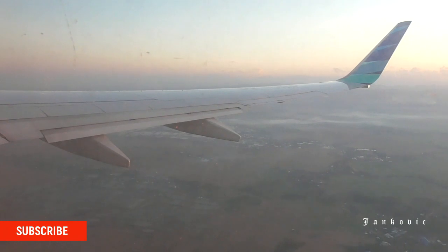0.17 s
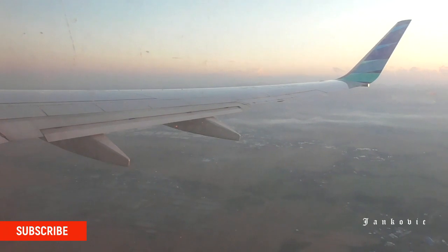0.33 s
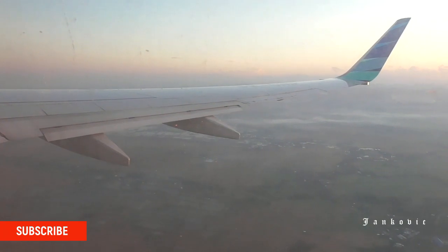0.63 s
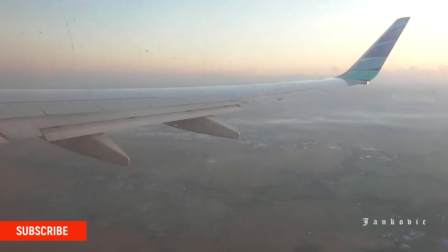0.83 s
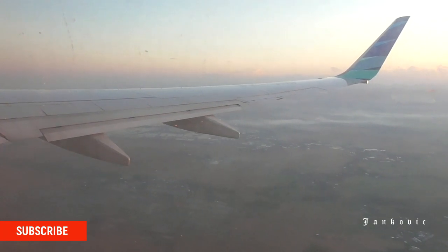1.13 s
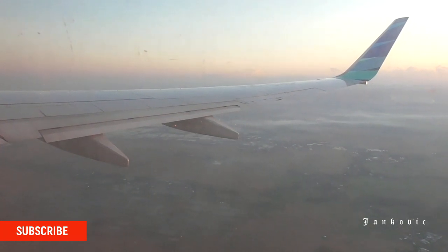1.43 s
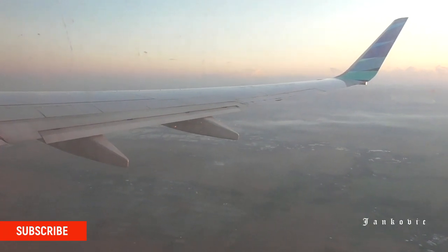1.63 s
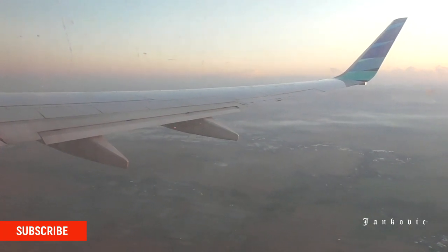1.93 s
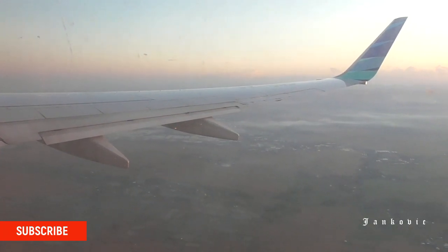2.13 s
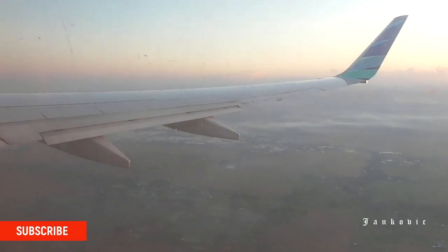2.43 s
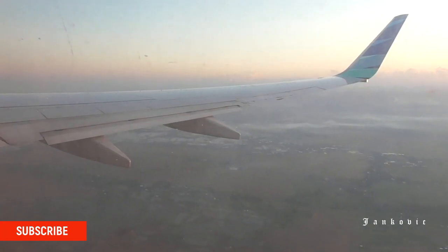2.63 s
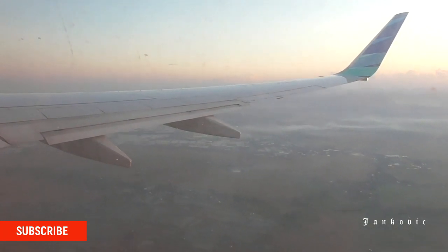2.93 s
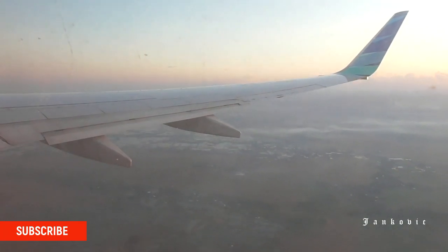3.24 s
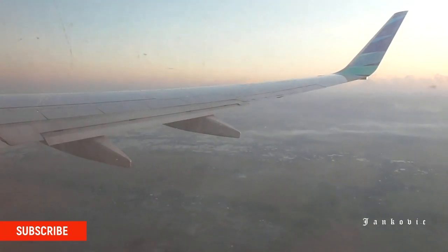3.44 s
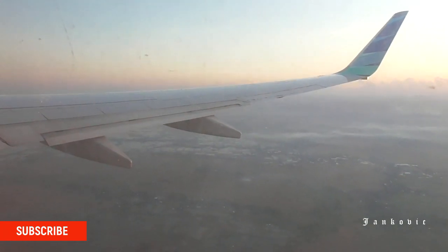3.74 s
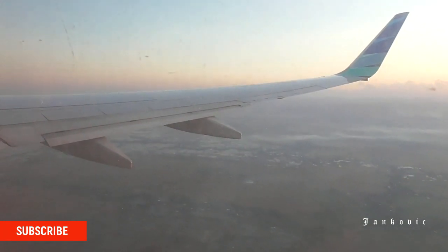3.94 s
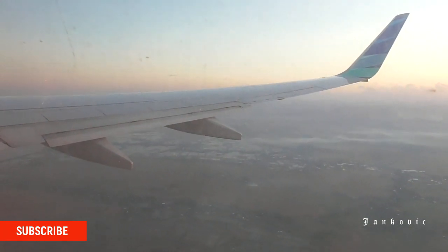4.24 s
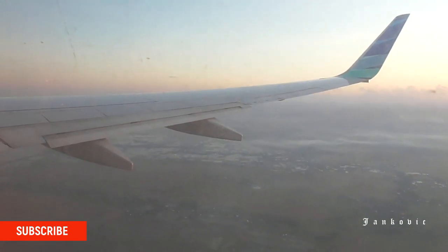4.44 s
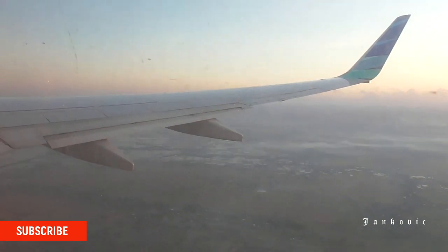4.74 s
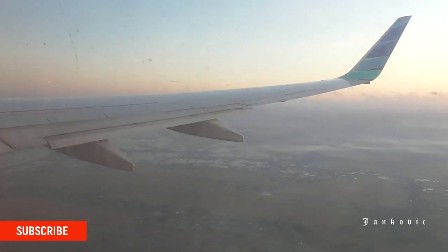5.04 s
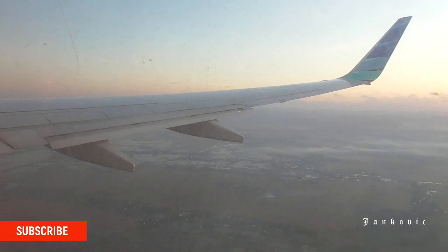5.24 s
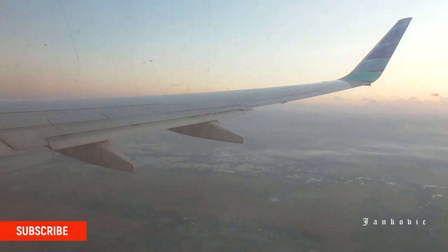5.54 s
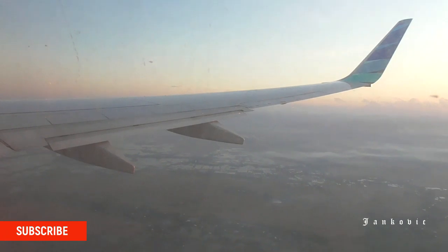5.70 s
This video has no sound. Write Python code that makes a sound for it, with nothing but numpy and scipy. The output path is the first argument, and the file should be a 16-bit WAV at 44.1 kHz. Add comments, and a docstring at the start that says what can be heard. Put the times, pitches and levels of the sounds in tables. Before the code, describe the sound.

A window seat inside a jet airliner in flight, about 5.9 seconds, starting almost instantly at full loudness and ending without a fade. A deep, dense engine roar dominates, heavy in the bass and low mids, fluttering randomly like wind-blown rumble but steady overall. A blurred low hum is buried in it, not a clear tone. Far beneath, muffled air rushes along the wall and window, with a very faint, wider vent hiss above. The air swells gently near 0.4 s, is weakest near 2.9 s, and recovers by 3.5 s. Very short low bumps of only a few milliseconds surface near 0.9, 1.4, 2.0, 2.3, 3.6, 4.2 and 4.4 s; the strongest, at 4.2 s, flattens in overload. The sound is close, dull and enclosed, nearly centred in the bass, with the deepest rumble thinned and the highest treble missing.

```python
"""A window seat in a jet airliner during climb, heard in stereo for 5.9 s.
Eases in within 2 ms to engine boom with a drone inside it, rushing air and vent hiss, all shaped noise.
Rush and hiss swell together near 0.4 s. From 0.9 to 4.4 s seven brief cosine crests replace the boom,
tallest at 4.2 s; the strongest overload and flatten. The air is faintest near 2.9 s."""
import sys
import numpy as np
from scipy import signal
from scipy.fft import next_fast_len
from scipy.io import wavfile
from scipy.ndimage import uniform_filter1d, minimum_filter1d

SR = 44100
rng = np.random.default_rng(int(sys.argv[2]) if len(sys.argv) > 2 else 0)


def output_pcm(signal):
    """Save a mono or channel-first signal as 16-bit PCM at the path in sys.argv[1].

    Samples are clipped to [-1, 1] before scaling.
    """
    pcm = np.clip(np.atleast_2d(signal).T, -1, 1) * 32767
    wavfile.write(sys.argv[1], SR, np.round(pcm).astype(np.int16))


N = 258867  # samples

# Engine roar through the fuselage, relative density: freq_hz, level_db
BOOM_SPECTRUM = [(16, -46), (28, -26), (45, -16.5), (70, -11.5), (105, -1.5), (150, 0.5), (200, 1.5),
                 (240, 0.5), (335, -0.5), (380, -13.5), (455, -16), (520, -29.5), (680, -53.5)]
# Airflow through wall panel and window, relative density: freq_hz, level_db
RUSH_SPECTRUM = [(310, -25), (520, -1.5), (689, -5.5), (755, -3), (805, 0), (845, -4.5), (894, -12.5),
                 (933, -14.5), (1100, -14), (1310, -16.5), (1530, -22.5), (1750, -34), (2000, -25.5),
                 (2110, -26), (2800, -37), (3640, -66.5), (6160, -120)]
# Vent air, relative density: freq_hz, level_db
HISS_SPECTRUM = [(2300, -24), (2800, -8.5), (3000, -8.5), (3370, 0.5), (3600, -4), (3860, 0.5),
                 (4100, -3.5), (5300, -9.5), (5800, -13.5), (7250, -8.5), (7700, -9.5), (10700, -9),
                 (12500, -13.5), (15600, -25.5)]
# Left-right likeness of the noise: freq_hz, likeness (1 = identical)
PORT_LIKENESS = [(40, 1), (290, 0.95), (850, 0.84), (1750, 0.57), (2050, .8), (2900, .2), (3400, 0.68),
                 (6500, .16), (14500, .15)]
# Phase by which left leads right: freq_hz, lead_rad
PORT_LEAD = [(30, 0), (2050, 0), (2900, 1), (3400, -0.9), (7000, 1), (8200, 4), (10800, 2.5), (12000, -0.2)]
# Left-right level balance: freq_hz, left_minus_right_db
PORT_BALANCE = [(60, 0.5), (210, -1), (350, 1.5), (770, -3), (1170, -1), (1900, -4), (4190, 0),
                (15000, -0.5)]
# Slow swell of the airflow: time_s, level_db
AIR_SWELL = [(0, -1), (.4, 1.5), (.9, 0.5), (1.15, -.5), (2.298, -0.3), (2.9, -1.5), (3.5, 0.15),
             (5.1, -.3), (5.87, 0)]
# Tall crests of the boom: centre_s, direction (+1 or -1), peak_db, left_minus_right_db
BOOM_CRESTS = [(.92, 1, .3, -1), (1.3993, 1, 1.5, -.9), (1.97, -1, .9, -.5), (2.3493, 1, .3, -1.1),
               (3.624, 1, -.3, -1), (4.1677, -1, 2.4, -.8), (4.383, -1, .2, 1.2)]

FRAME_SAMPLES, HOP_SAMPLES = 4096, 1024
BOOM_DB, BOOM_CEILING_DB = -12, -0.6  # mid rms before levelling; envelope ceiling before crests
DRONE_HZ, DRONE_WIDTH_HZ, DRONE_DB = 184.5, 20, -17  # mid rms before levelling
CREST_HZ, CREST_SPREAD_S = 225, 0.0033
RUSH_DB, HISS_DB, HISS_SWELL_SHARE = -36, -62.5, 0.9  # levels before the swell is added
LOW_CUT_HZ, EDGE_HZ, OPENING_S = 34, 15720, 0.0019


def gain_of(db):
    """Decibels to amplitude."""
    return 10 ** (np.asarray(db) / 20)


def evened(x):
    """Scales to unit rms."""
    return x / np.sqrt(np.mean(abs(x) ** 2) + 1e-20)


def read(points, hz):
    """Reads a table on a log-frequency axis."""
    point_hz, value = np.transpose(points)
    return np.interp(np.log(hz + 1), np.log(point_hz + 1), value)


def air_noise(shape, patchy_db):
    """Stereo noise of unit mid rms: shaped spectrum, partly shared ports, drifting level patches."""
    frames, hz = N // HOP_SAMPLES + 6, np.fft.rfftfreq(FRAME_SAMPLES, 1 / SR)
    a, b, c, d, patches = rng.standard_normal((frames, len(hz), 5)).T
    patches = uniform_filter1d(patches, size=40, axis=0)  # across bins
    patches = evened(uniform_filter1d(patches, size=4, axis=1))  # across frames

    likeness = np.clip(read(PORT_LIKENESS, hz), -1, 1)[:, None]
    left, other = a + 1j * b, c + 1j * d
    right = likeness * left + np.sqrt(1 - likeness ** 2) * other
    right = right * np.exp(-1j * read(PORT_LEAD, hz))[:, None]
    balance = gain_of(read(PORT_BALANCE, hz) / 2)[:, None]

    bins = np.array([left * balance, right / balance])
    bins = bins * shape(hz)[:, None] * gain_of(patchy_db * patches)
    x = signal.istft(bins, nperseg=FRAME_SAMPLES, noverlap=FRAME_SAMPLES - HOP_SAMPLES)[1]
    x = x[:, FRAME_SAMPLES:FRAME_SAMPLES + N]
    return x / np.sqrt(np.mean(x.mean(0) ** 2))


def band(spectrum, level_db, patchy_db):
    """Noise shaped by a spectrum table, silent outside its end frequencies."""
    low_hz, high_hz = spectrum[0][0], spectrum[-1][0]

    def shape(hz):
        return gain_of(read(spectrum, hz)) * (hz > low_hz) * (hz < high_hz)

    return gain_of(level_db) * air_noise(shape, patchy_db)


def engine_boom():
    """Low broadband engine roar as filtered by the fuselage."""
    return band(BOOM_SPECTRUM, BOOM_DB, 0.8)


def cabin_drone():
    """A cabin mode humming within the boom: noise in one narrow resonance."""
    def shape(hz):
        return 1 / (1 + (2 * (hz - DRONE_HZ) / DRONE_WIDTH_HZ) ** 2)

    return gain_of(DRONE_DB) * air_noise(shape, 0)


def levelled(boom):
    """Eases swells that would pass the ceiling down to it, smoothly over a few cycles."""
    envelope = abs(signal.hilbert(boom, next_fast_len(N))[:, :N]).max(0)
    gain = np.minimum(gain_of(BOOM_CEILING_DB) / envelope, 1)
    gain = minimum_filter1d(gain, size=600)
    gain = uniform_filter1d(uniform_filter1d(gain, size=300), size=300)
    return boom * gain


def skin_rush(swell_db):
    """Turbulent air along skin and window: mid-band noise following the swell."""
    return band(RUSH_SPECTRUM, RUSH_DB + swell_db, 0.89)


def vent_hiss(swell_db):
    """Air from the vents: treble noise following part of the swell."""
    return band(HISS_SPECTRUM, HISS_DB + HISS_SWELL_SHARE * swell_db, 0.6)


def crested(boom):
    """At each crest the boom gives way to a tall half-wave with a cycle either side."""
    t = np.arange(N) / SR
    for centre_s, direction, peak_db, balance_db in BOOM_CRESTS:
        window = np.exp(-((t - centre_s) / CREST_SPREAD_S) ** 2)
        side_gains = gain_of(peak_db + balance_db * np.array([[0.5], [-0.5]]))
        wave = direction * side_gains * np.cos(2 * np.pi * CREST_HZ * (t - centre_s))
        boom = (1 - window) ** 2 * boom + window * wave
    return boom


def scene():
    """Levelled, crested boom and drone, with rush and hiss that swell together."""
    swell_db = np.interp(np.arange(N) / SR, *np.transpose(AIR_SWELL))
    boom = crested(levelled(engine_boom() + cabin_drone()))
    return boom + skin_rush(swell_db) + vent_hiss(swell_db)


def record(dry):
    """Deep bass is dropped; the start is eased in; peaks clip at full scale; top treble is cut."""
    low_cut = signal.butter(3, LOW_CUT_HZ, "high", fs=SR, output="sos")
    thinned = signal.sosfilt(low_cut, dry)
    opening = np.sin(np.pi / 2 * np.minimum(np.arange(N) / SR / OPENING_S, 1)) ** 2
    clipped = np.clip(thinned * opening, -1, 1)
    treble_cut = signal.firwin(1023, EDGE_HZ, window=("kaiser", 9), fs=SR)
    return signal.oaconvolve(clipped, treble_cut[None], "same")


dry = scene()
out = record(dry)
output_pcm(out)
```